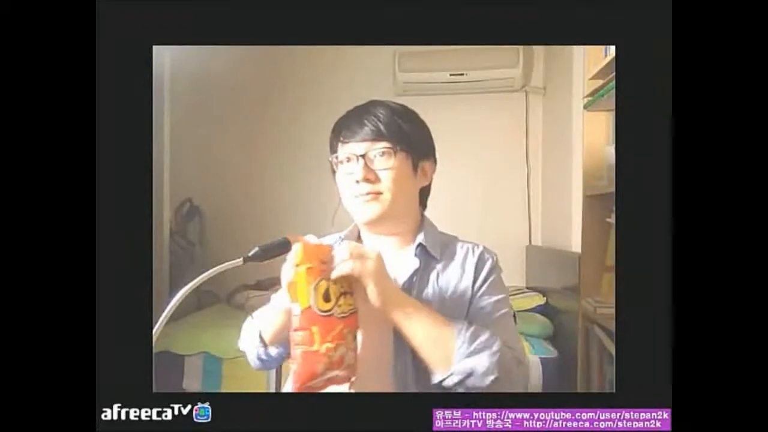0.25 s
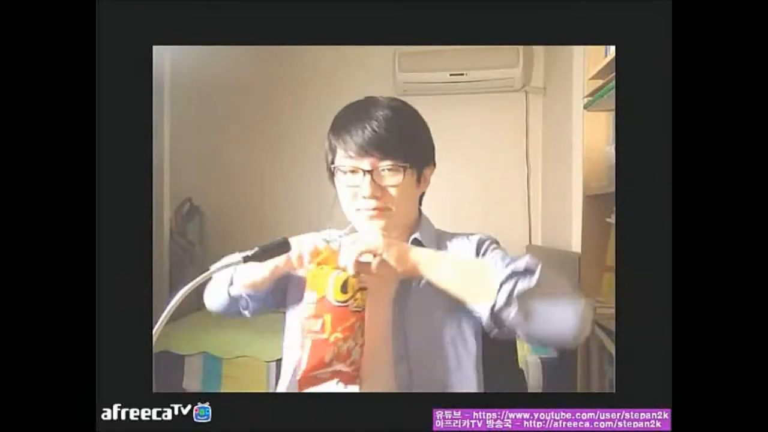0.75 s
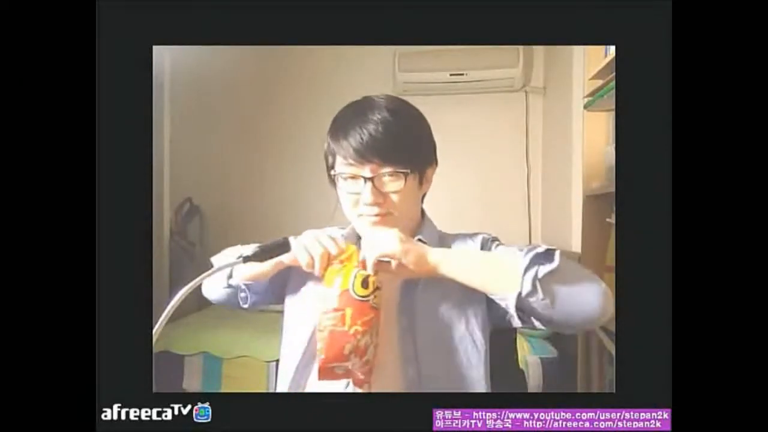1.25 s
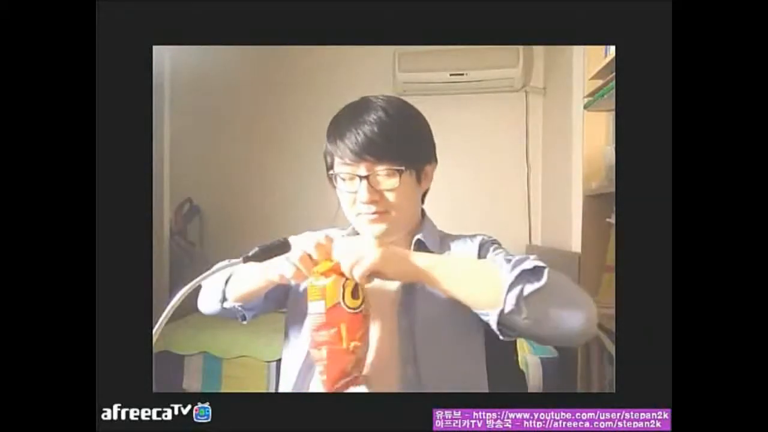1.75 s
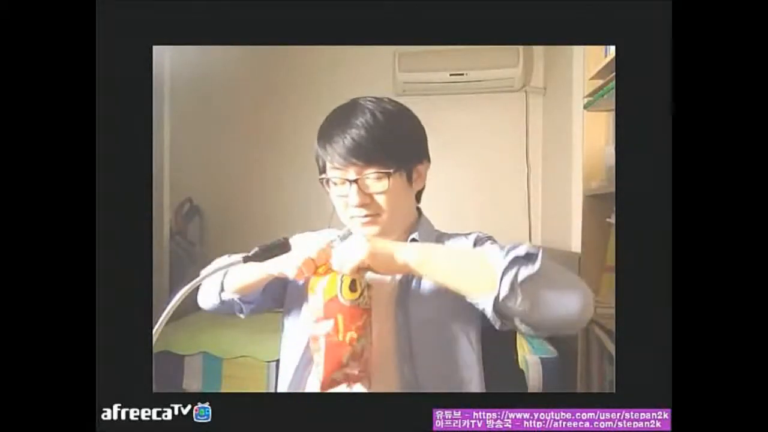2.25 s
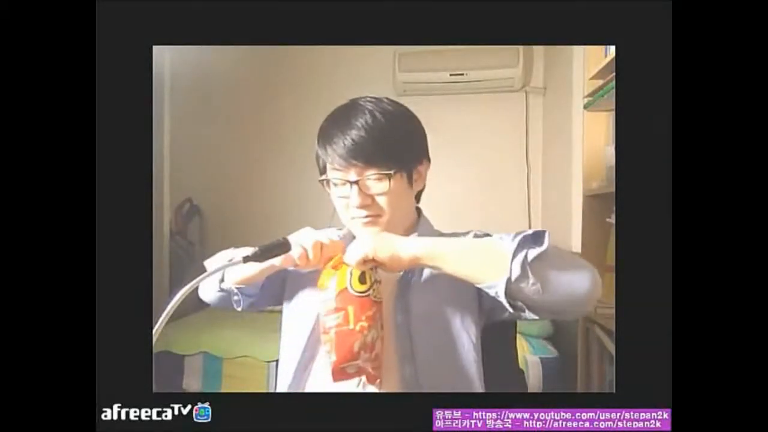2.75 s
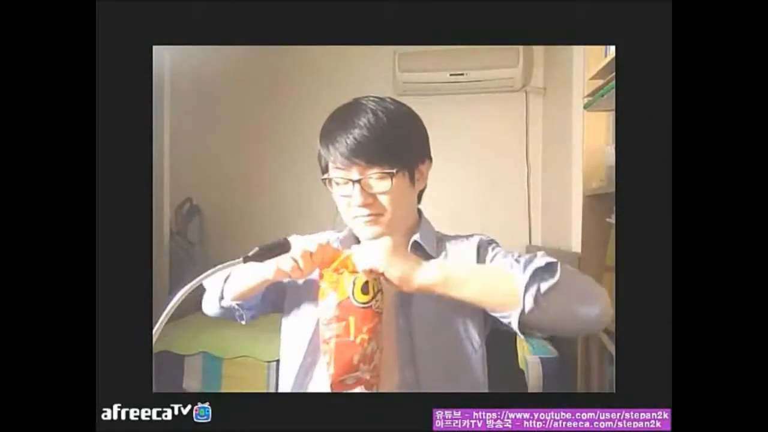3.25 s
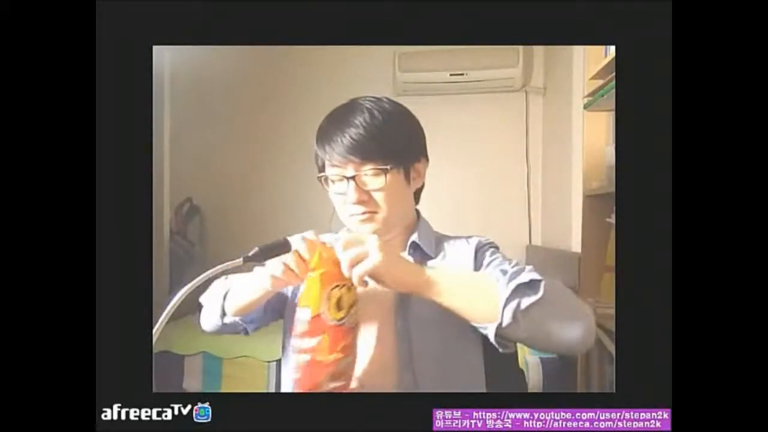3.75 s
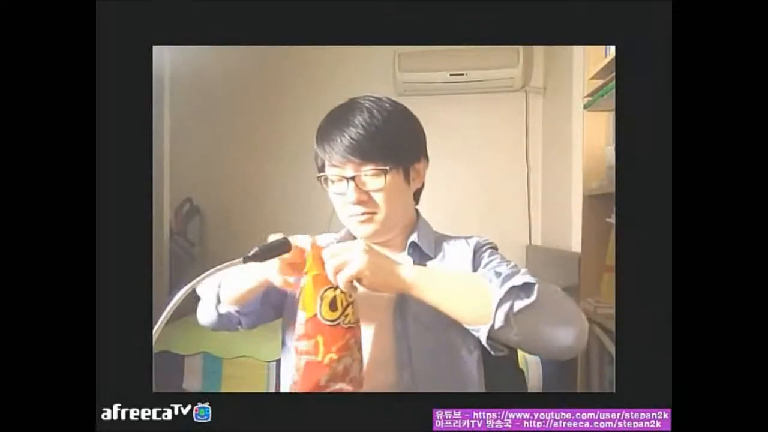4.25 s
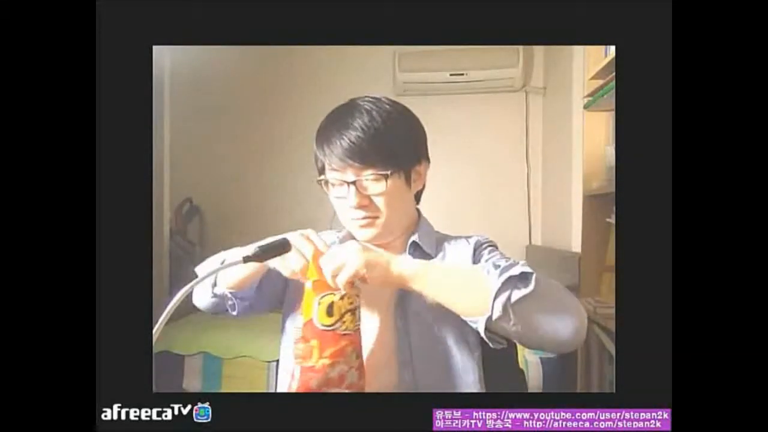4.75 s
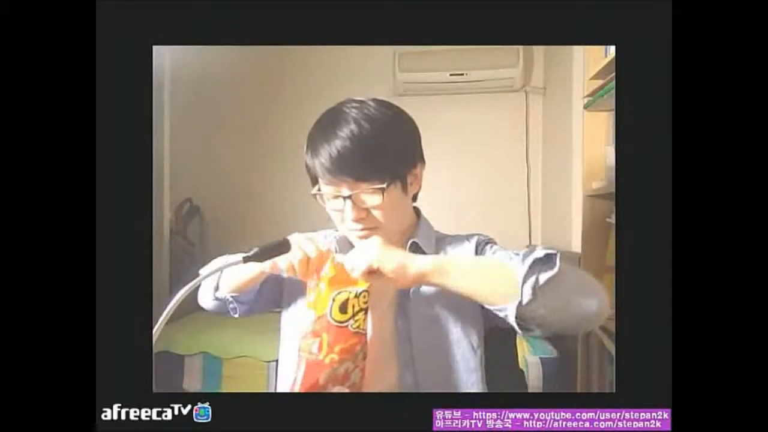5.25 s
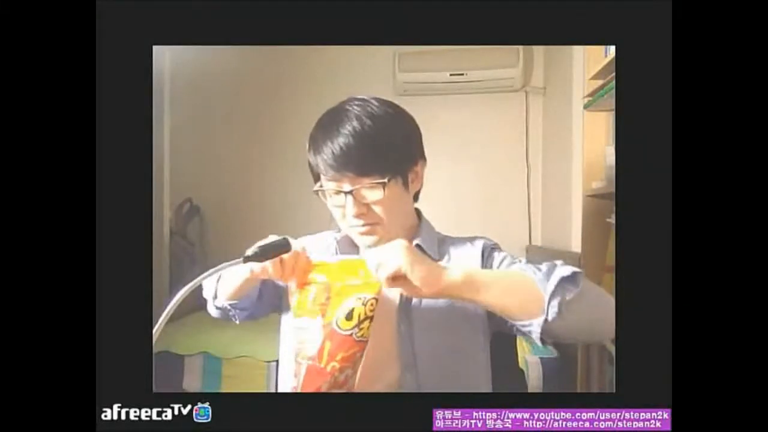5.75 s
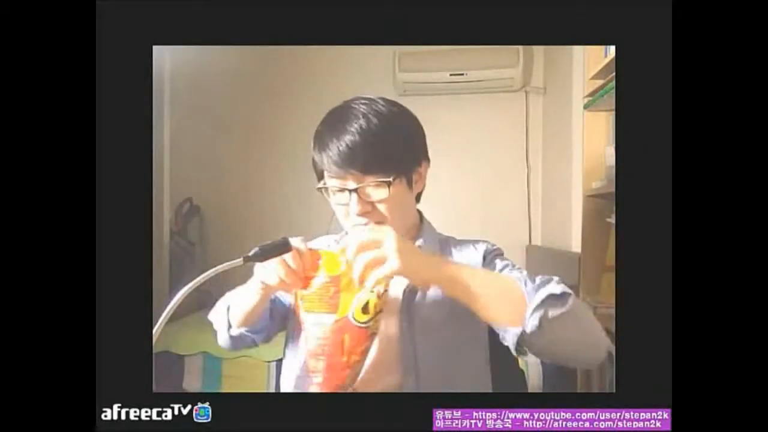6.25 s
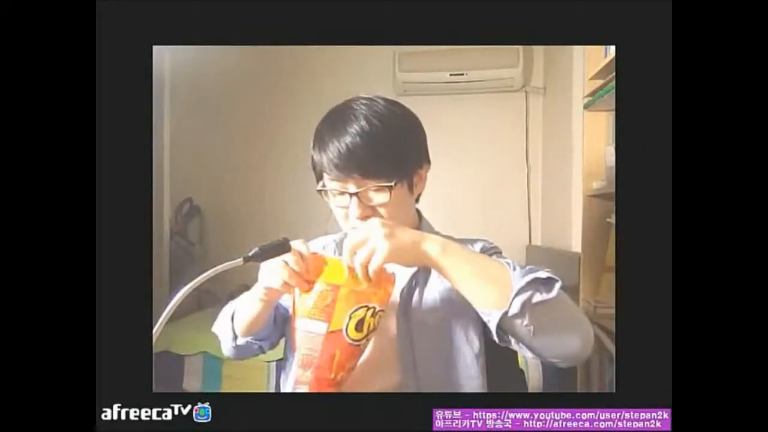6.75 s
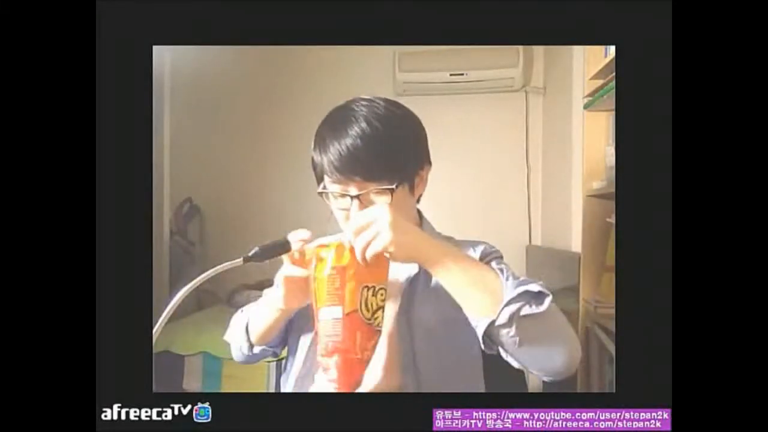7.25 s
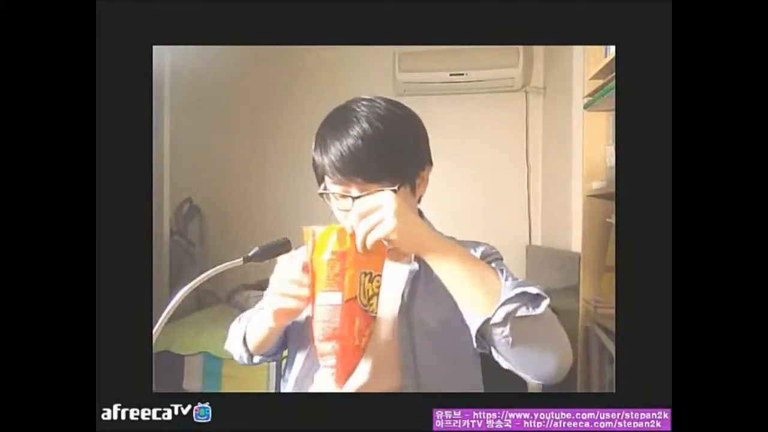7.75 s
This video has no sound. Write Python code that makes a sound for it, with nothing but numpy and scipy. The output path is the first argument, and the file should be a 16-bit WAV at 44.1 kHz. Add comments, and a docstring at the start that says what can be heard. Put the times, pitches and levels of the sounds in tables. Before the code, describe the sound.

Close to a desk microphone in a small room, fingers work a plastic snack bag. Bright crinkles and sharp snaps come in irregular bursts with short lulls, with a few hollow knocks as panels buckle. At six seconds the hardest pull rips the seam, then smaller crackles thin out until just before eight. A steady low mains hum and very faint hiss run underneath.

```python
"""A plastic snack bag, straight ahead and close to a desk microphone in a small room, over mains hum and faint hiss.
From the start fingers pull the film in short bursts: tiny creases crumple, single ones snap, panels knock.
At six seconds the hardest pull rips the seam; smaller pulls and snaps follow until just before eight.
Film sounds are impulses with scattered echoes, coloured by the plastic; hum is sines, hiss is shaped noise."""
import sys
import numpy as np
from scipy import signal
from scipy.fft import rfft, irfft
from scipy.io import wavfile
from scipy.ndimage import map_coordinates

SR = 44100
rng = np.random.default_rng(int(sys.argv[2]) if len(sys.argv) > 2 else 0)


def dump_mix(stems):
    """Bounce the given channels to the path in sys.argv[1] as a 16-bit WAV at rate SR."""
    frames = np.atleast_2d(stems).T  # one column per channel
    limited = np.clip(frames, -1, 1)  # hard clip at full scale
    pcm = np.round(limited * 32767).astype(np.int16)
    wavfile.write(sys.argv[1], SR, pcm)


N = 353241


def gain_of(db):
    """Turns decibels into amplitude."""
    return 10 ** (np.asarray(db) / 20)


def read_curve(points, hz):
    """Reads a table at the given frequencies, interpolating on a logarithmic axis."""
    point_hz, value = np.transpose(points)
    return np.interp(np.log(hz + 1), np.log(point_hz + 1), value)


def add(mix, start_s, sound):
    """Mixes a sound in at its start time, cut off at the end of the mix."""
    part = mix[max(round(start_s * SR), 0):][:len(sound)]
    part += sound[:len(part)]


# Mains tone in the microphone line and its overtones: (multiple of the mains frequency, level [dB rms])
HUM_PARTIALS = [(1, -46.5), (2, -77.5), (3, -83), (5, -83), (7, -85), (11, -88.5), (13, -88)]
MAINS_HZ = 60.03


def hum():
    """An almost pure mains tone in the microphone line: steady sines at random phases."""
    turns = MAINS_HZ * np.arange(N) / SR
    out = np.zeros(N)
    for multiple, db in HUM_PARTIALS:
        phase_turns = rng.random()
        out += gain_of(db) * np.sqrt(2) * np.sin(2 * np.pi * (round(multiple) * turns + phase_turns))
    return out


def noise(spectrum):
    """Steady random noise with the colour of a spectrum table, scaled to rms 1."""
    colour = gain_of(read_curve(spectrum, np.fft.rfftfreq(N, 1 / SR)))
    coloured = irfft(rfft(rng.standard_normal(N)) * colour, N)
    return coloured / np.sqrt(np.mean(coloured ** 2) + 1e-20)


# Colour of the hiss shared by both channels: (frequency [Hz], relative density [dB per Hz])
HISS_SPECTRUM = [(20, 11.5), (70, 22), (150, 7), (300, 4), (520, -3.5), (720, 3), (1100, -3.5), (2000, -4),
                 (3400, 0.5), (5000, -3.5), (7000, -10.5), (8700, -18), (10000, -43.5)]
# Colour of the noise of opposite sign in each channel: (frequency [Hz], relative density [dB per Hz])
HISS_SIDE_SPECTRUM = [(25, 22.5), (60, 2.5), (170, 11.5), (600, 3.5), (4500, 6.5), (8500, 2), (10000, -29)]


def hiss(level_db=-68.0, side_db=-75):
    """Steady faint hiss, mostly shared, with a little weaker noise of opposite sign in each channel; dB rms."""
    side = gain_of(side_db) * noise(HISS_SIDE_SPECTRUM)
    return gain_of(level_db) * noise(HISS_SPECTRUM) + np.array([side, -side])


# Decay of the small room: (frequency [Hz], time to fall by 60 dB [s])
ROOM_DECAY = [(200, 0.33), (1000, 0.26), (3500, 0.3), (8000, 0.32)]


def room(bag, wet_db=-14.5, width=0.07, early=1.0, early_s=0.031):
    """Strong early reflections from desk and walls, then a dense tail, nearly alike in both channels."""
    delay = np.arange(SR // 2) / SR
    present = rng.random((2, len(delay))) < .1
    taps = rng.standard_normal((2, len(delay))) * present
    taps *= (delay > .006) * (1 + early * np.exp(-delay / early_s))
    # each frequency dies away at its own rate
    hz, t, bands = signal.stft(taps, SR)
    decay = gain_of(-60 * t / read_curve(ROOM_DECAY, hz)[:, None])
    mid, side = signal.istft(bands * decay, SR)[1]
    tail = np.array([mid + width * side, mid - width * side]) / np.linalg.norm(mid)
    return gain_of(wet_db) * signal.fftconvolve(bag[None], tail, axes=1)[:, :N]


HZ = np.fft.rfftfreq(2048, 1 / SR)  # frequency grid of one film sound
T = np.arange(2048) / SR  # time grid of one film sound, in seconds


def ring(colour_db, scatter, t60, damping_hz=5500):
    """One impulse and its echoes across the film, which lose treble on the way; causally coloured, energy 1."""
    echoes = rng.standard_normal(len(T)) * gain_of(-60 * T / t60)
    treble_loss = np.sqrt(1 + (HZ / damping_hz) ** 2)
    blow = 1 + scatter * rfft(echoes / np.linalg.norm(echoes)) / treble_loss
    # minimum phase: the colour builds up only after the impulse
    log_gain = np.log(gain_of(np.r_[colour_db, colour_db[-2:0:-1]]))
    causal = np.exp(np.conj(signal.hilbert(log_gain)))[:len(HZ)]
    sound = irfft(blow * causal)
    return rng.choice([-1, 1]) * sound / np.linalg.norm(sound)


# Hollow knocks as a panel buckles or is jerked against the air in the bag:
# (time [s], peak level before the trim in pops [dB], resonance [Hz])
PANEL_POPS = [(.617, -38, 650), (.766, -34.5, 684), (.787, -42.5, 605), (0.874, -41.5, 530),
              (0.939, -36.5, 380), (1.057, -43.5, 397), (2.01, -41, 227), (2.274, -47, 400),
              (2.703, -34.5, 734), (2.702, -42, 316), (3.140, -43, 355), (3.823, -36.5, 135),
              (3.904, -38, 230), (3.905, -41.5, 400), (4.603, -41.5, 417), (4.62, -40, 162),
              (5.757, -40, 166), (5.796, -40, 150), (6.013, -33, 165), (6.033, -34, 120), (6.049, -38, 704),
              (6.992, -47, 149), (7.39, -39.5, 135)]


def pops(trim_db=0.5, width_hz=120, dull_hz=2000):
    """Buckling panels give short, hollow, heavily damped knocks with little treble."""
    out = np.zeros(N)
    for start_s, db, hz in PANEL_POPS:
        detuning = (HZ ** 2 - hz ** 2) / ((HZ + 1) * width_hz)
        colour_db = -10 * np.log10((1 + detuning ** 2) * (1 + (HZ / dull_hz) ** 2))
        knock = ring(colour_db, scatter=.55, t60=.025)
        add(out, start_s, gain_of(trim_db + db) * knock / abs(knock).max())
    return out


# Slow flexing of the film around a crease: (frequency [Hz], relative density [dB per Hz])
FLEX_SPECTRUM = [(40, -18), (110, -6), (220, -1), (400, -1.5), (700, 0), (950, -4.5), (1500, -2.5),
                 (3000, -81)]


def flex(scatter=0.97, t60=0.067):
    """The dull knock of the film that a crease pulls along."""
    return ring(read_curve(FLEX_SPECTRUM, HZ), scatter, t60)


# Bright sound of the film: (frequency [Hz], relative density [dB per Hz])
FILM_SPECTRUM = [(300, -15), (700, -5.5), (900, -3.5), (1300, -1), (1900, -5), (2600, -3.5), (3500, 0),
                 (4200, -7.5), (5200, -9.5), (6400, -17), (7800, -25.5), (9000, -37.5), (10000, -52)]
CREASE_T60 = 0.024  # decay of the echoes in a crease, in seconds


def crease(pitch_hz, facets_db=3.5, scatter=0.84, focus_db=8, focus_octaves=1.0, lean=2.24,
           middle_hz=3230, bass_db=5, facets_hz=430):
    """A short crease rings high and a long one low; each facet of film adds broad resonances of its own."""
    # the hump lies lean times as many octaves from middle_hz as pitch_hz does
    octaves = np.log2((HZ + 1) / middle_hz) - lean * np.log2(pitch_hz / middle_hz)
    focus = focus_db * np.exp(-(octaves / focus_octaves) ** 2)
    # a crease is too small to radiate well below its hump: bass_db lost per octave, for three octaves
    bass_loss = bass_db * np.clip(octaves, -3, 0)
    facets = map_coordinates(rng.standard_normal(len(HZ)), [HZ / facets_hz], mode="mirror")
    colour_db = read_curve(FILM_SPECTRUM, HZ) + focus + bass_loss + facets_db * facets
    return ring(colour_db, scatter, CREASE_T60)


def holding(hush_db=-2.5, hold_s=0.021, pause_s=.028):
    """The film holds almost still while strain builds towards the first snap of a burst."""
    gain = np.ones(N)
    times = np.transpose(CREASE_SNAPS)[0]
    first_of_burst = np.diff(times, prepend=0) > pause_s
    for snap_s in times[first_of_burst]:
        gain[max(round((snap_s - hold_s) * SR), 0):round(snap_s * SR)] = gain_of(hush_db)
    return gain


# Fingers squeeze or pull the film; the hardest pull rips the seam:
# (start [s], length [s], effort halfway through [dB], swell from start to end [dB])
FINGER_PULLS = [(0, 0.032, -47.5, -10), (0.068, 0.073, -51.5, 7.5), (0.248, 0.022, -39.5, -1.5),
                (0.383, 0.152, -50.0, -6.5), (0.596, 0.1, -51, -3), (0.741, 0.187, -49, 8),
                (1.089, 0.052, -43.0, 1), (1.577, 0.21, -59.5, -15), (1.838, 0.333, -47.5, -3),
                (2.262, 0.11, -49, 13), (2.423, 0.15, -53.5, -5.5), (2.593, 0.114, -52.5, -4.5),
                (3.173, 0.094, -47, -15), (3.454, 0.047, -56, -3), (3.816, 0.2, -52.5, -13),
                (4.116, 0.19, -65, 16), (4.355, 0.111, -54.5, -0.5), (4.561, 0.059, -46.5, 15),
                (4.71, 0.023, -47.5, -16), (4.8, 0.25, -53, -6), (5.213, 0.148, -49, -3.5),
                (5.375, 0.071, -44, -1), (5.627, 0.21, -50.5, -3), (5.742, 0.069, -43.5, -12),
                (5.934, 0.063, -55.5, 23), (5.994, 0.052, -33.5, 3.5), (6.201, 0.06, -53.5, 3),
                (6.318, 0.241, -55.5, 0.5), (6.769, 0.078, -54.5, -12), (6.952, 0.038, -43, 7),
                (7.177, 0.17, -57.0, -0.5), (7.383, 0.13, -48.5, -19)]
GRIP_S, RELEASE_S = 0.01, .012  # a pull takes hold, and dies away, in these times
RESTING_DB = -73  # effort on a bag merely held in the hands
SETTLE_DB, SETTLE_S = -20, 0.017  # crumpling after a snap: level relative to the snap, decay time


def effort():
    """How hard the film is worked: pulls take hold, swell or slacken, and let go; each snap unsettles it."""
    power = np.full(N, gain_of(RESTING_DB) ** 2)
    for start_s, length_s, db, swell_db in FINGER_PULLS:
        t = np.arange(0, length_s + 10 * RELEASE_S, 1 / SR)
        shape = np.minimum(t / GRIP_S, 1) * np.exp(-np.maximum(t - length_s, 0) / RELEASE_S)
        pull_db = db + swell_db * (np.minimum(t / length_s, 1) - .5)
        add(power, start_s, (shape * gain_of(pull_db)) ** 2)
    settling = np.exp(-np.arange(0, 10 * SETTLE_S, 1 / SR) / SETTLE_S)
    for snap_s, db, *_ in CREASE_SNAPS:
        add(power, snap_s, (gain_of(db + SETTLE_DB) * settling) ** 2)
    return np.sqrt(power)


def crumple(fine_db=-1.46, flex_db=-13, rate=400, crowding=0.83, spread_db=6.5, pitch_hz=3080,
            octaves=0.48, count=36):
    """Many tiny creases at random moments; harder work makes them both louder and more crowded."""
    level = effort()
    per_s = rate * (level / level.mean()) ** crowding
    size = gain_of(spread_db * np.minimum(rng.exponential(1, N), 4))
    size *= rng.random(N) < per_s / SR
    # the creases of any one moment (40 ms) share the energy that the fingers put in
    moment = signal.windows.hann(round(.04 * SR))
    shared = signal.oaconvolve(size ** 2, moment / moment.sum(), "same")
    size *= level / np.sqrt(abs(shared) + 100 / SR)
    size *= holding()
    # each crease is one of a fixed set of ticks, from low to high
    kind = rng.integers(0, count, N)
    out = np.zeros(N)
    for k, stiffness in enumerate(np.linspace(-1, 1, count)):
        tick = crease(pitch_hz * 2 ** (octaves * stiffness), facets_db=2.5, scatter=2.4)
        sound = gain_of(fine_db) * tick + gain_of(flex_db) * flex()
        out += signal.oaconvolve(size * (kind == k), sound)[:N]
    return out


def ticks(per_s=25, typical_db=-21.5, typical_effort_db=-50, follow=.87, spread_db=3, pitch_hz=3100,
          octaves=0.24, flex_db=-12):
    """Middling creases give way at chance moments: louder under effort, faint while the bag is only held."""
    out = np.zeros(N)
    level = (effort() / gain_of(typical_effort_db)) ** follow * holding()
    # one tick at a random place in each equal slot of time
    slots = np.arange(int(per_s * (N - 1) / SR))
    times = (slots + rng.random(len(slots))) / per_s
    for start_s, (size, stiffness, slack) in zip(times, rng.standard_normal((len(slots), 3))):
        strength = gain_of(typical_db) * min(level[int(start_s * SR)] * gain_of(spread_db * size), 2)
        bright = crease(pitch_hz * 2 ** (octaves * stiffness))
        dull = gain_of(flex_db + spread_db * slack) * flex()
        add(out, start_s, strength * (bright + dull))
    return out


# Single creases that stand out close to the microphone as they flip over:
# (time [s], level as if spread over 5 ms, before the trim in snaps [dB], pitch setting of the crease [Hz],
#  flex of the film around it, relative to that level [dB])
CREASE_SNAPS = [(0.1318, -48.5, 2800, -30), (0.1926, -43.5, 2570, -5), (0.212, -39.5, 2970, -13),
                (0.2414, -42, 3700, -13), (0.256, -36, 3600, -39), (0.273, -37.5, 2940, -15),
                (0.3612, -42.5, 2880, -11), (0.4171, -32.0, 2900, -27), (0.4418, -37.5, 3700, -26),
                (0.5061, -41, 2900, -37), (0.5257, -38, 2860, -16), (0.5862, -38.5, 3150, -12),
                (0.616, -27.5, 2800, -17.5), (0.6323, -29.5, 3130, -15), (0.7667, -35, 2850, -9.5),
                (0.7846, -42.5, 3280, -20), (0.811, -32, 3750, -15.5), (0.8214, -30.5, 3460, -19),
                (0.8743, -40.0, 3260, -8.5), (0.8893, -35, 3150, -8), (0.906, -40.5, 3260, -19),
                (0.9265, -35.5, 3180, -16), (1.1106, -35.5, 3250, -28), (1.1724, -41.0, 3180, -17),
                (1.3348, -49, 2860, -32), (1.3832, -48, 2620, -3), (1.4773, -48.5, 2460, -7),
                (1.5989, -43, 3300, -30), (1.6113, -37, 3400, -27), (1.6257, -40, 3450, -12.5),
                (1.6787, -44.0, 3030, -28), (1.7207, -41.5, 3200, -18), (1.8112, -47.0, 3380, -32),
                (1.8552, -42.5, 3600, -15), (1.9068, -37.5, 3030, -16), (1.9342, -34.5, 3250, -24),
                (1.9593, -34, 3700, -12.5), (2.0125, -28, 3600, -24), (2.0462, -39, 3440, -37),
                (2.0804, -34, 3980, -23), (2.1296, -39, 3960, -34), (2.1704, -38, 4250, -32),
                (2.2077, -42.5, 2880, -5), (2.297, -42, 3500, -32), (2.3556, -37.0, 2960, -32),
                (2.4643, -38.0, 2880, -8), (2.6012, -41, 3010, -8), (2.618, -38, 3070, -17),
                (2.643, -37, 2880, -22), (2.675, -39.5, 3500, -29), (2.702, -32.0, 3080, -13),
                (3.0075, -51.5, 2640, -13), (3.071, -47.5, 3800, -31), (3.1401, -35.5, 2770, -12.5),
                (3.1932, -38.5, 3770, -13), (3.2205, -34, 3250, -20.5), (3.343, -54.0, 3710, -24),
                (3.4857, -44, 3580, -27), (3.7279, -40.5, 3350, -12), (3.809, -30.5, 3550, -30),
                (3.8254, -34.5, 3580, -14), (3.904, -34, 3320, -20), (3.9218, -30.5, 3380, -38),
                (3.9517, -36.5, 3430, -16), (3.9874, -40.5, 3370, -6.5), (3.9996, -39, 3290, -21),
                (4.0767, -37, 3330, -15), (4.1457, -49.0, 2110, -7), (4.181, -48, 3260, -30),
                (4.209, -41.5, 3730, -5), (4.2837, -43.5, 3380, -23), (4.3376, -40.5, 2660, -5.5),
                (4.3638, -36, 2850, -16), (4.3942, -34, 3160, -23), (4.4117, -43, 2990, -34),
                (4.607, -30.5, 3100, -12), (4.6679, -42.5, 3340, -12), (4.7491, -33, 3400, -27),
                (4.9009, -36, 3650, -9.5), (4.91, -44.5, 3670, -5), (4.9364, -38.0, 2820, -32),
                (4.9498, -36.5, 3190, -13), (5.141, -47, 3670, -11), (5.1681, -38.5, 3220, -10.5),
                (5.2467, -37, 3670, -22), (5.3053, -39.5, 3760, -36), (5.37, -36.5, 3260, -30),
                (5.3774, -34.0, 3440, -41), (5.3923, -30.5, 3100, -33), (5.498, -46, 2860, -10),
                (5.6429, -35, 3140, -12), (5.6564, -32.5, 3040, -19), (5.8427, -40, 2900, -10),
                (6.0105, -29.5, 3280, -22), (6.0368, -25.5, 3900, -25), (6.0593, -37.5, 4020, -26),
                (6.2486, -35.0, 3220, -19), (6.3017, -45.0, 3500, -24), (6.4052, -35, 3430, -14.5),
                (6.442, -40.5, 2760, -9.5), (6.55, -52.5, 2980, 1.5), (6.8088, -37.5, 3350, -32),
                (6.9238, -42.5, 2340, -19), (7.058, -51, 2530, -2.5), (7.2066, -48.5, 3140, -25),
                (7.284, -46, 3020, -7), (7.3548, -51, 3070, -20), (7.3914, -33.5, 3440, -15.5),
                (7.4456, -39, 3170, -32), (7.4757, -37.5, 3970, -14), (7.5312, -45, 3610, -28),
                (7.5968, -50, 3480, -8.5), (7.7428, -57, 3740, -7), (7.9191, -36, 3660, -33)]
SNAP_S = .005


def snaps(crease_db=-.1, catch_db=-9, catch_spread_db=4, catch_s=.004):
    """Single loud creases, each with its knock; a crease catches halfway and flips again a moment later."""
    out = np.zeros(N)
    chances = rng.random((len(CREASE_SNAPS), 2))
    for (start_s, db, pitch_hz, flex_db), (wait, size) in zip(CREASE_SNAPS, chances):
        strength = gain_of(db) * np.sqrt(SNAP_S * SR)
        first_flip = gain_of(crease_db) * crease(pitch_hz) + gain_of(flex_db) * flex()
        add(out, start_s, strength * first_flip)
        second_db = catch_db + catch_spread_db * (2 * size - 1.5)
        add(out, start_s + wait * catch_s, strength * gain_of(second_db) * crease(pitch_hz))
    return out


def scene():
    """The bag straight ahead, its room, and the steady hum and hiss."""
    bag = snaps() + crumple() + ticks() + pops()
    return bag + room(bag) + hum() + hiss()


EDGE_HZ = 9900


def record(dry):
    """The band limit of the recorder: a linear-phase low-pass filter."""
    low_pass = signal.firwin(301, EDGE_HZ, window=("kaiser", 8), fs=SR)
    return signal.oaconvolve(dry, low_pass[None], "same")


dry = scene()
out = record(dry)
dump_mix(out)
```